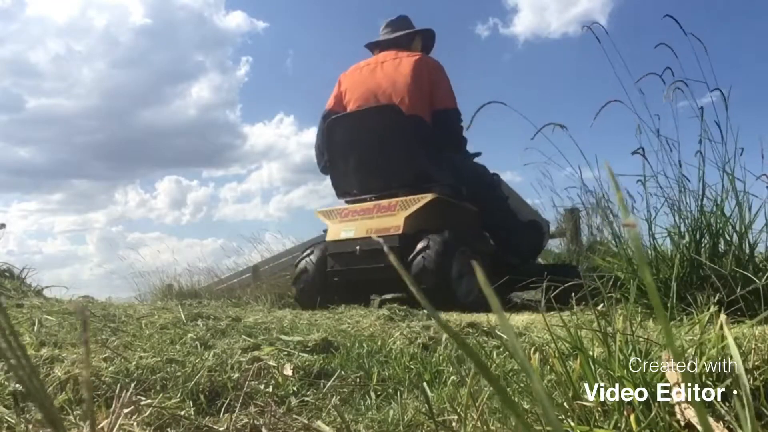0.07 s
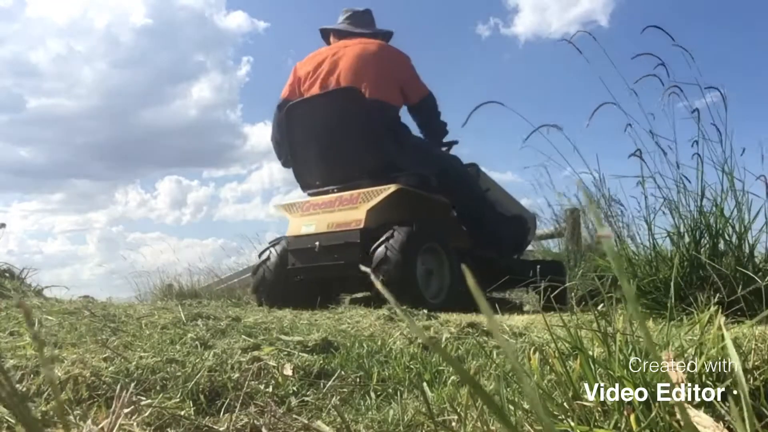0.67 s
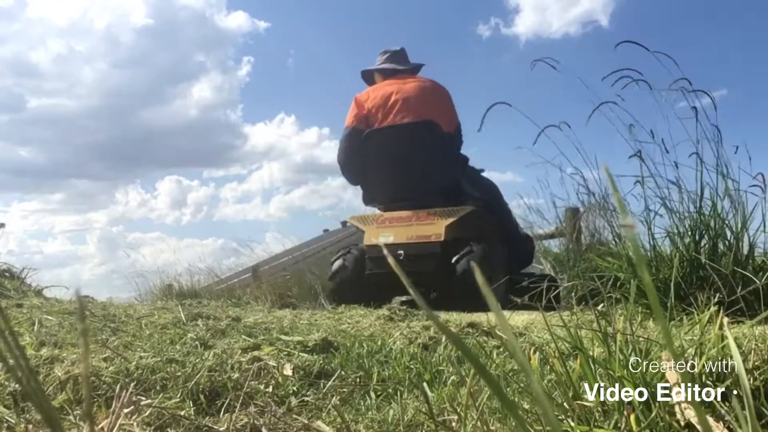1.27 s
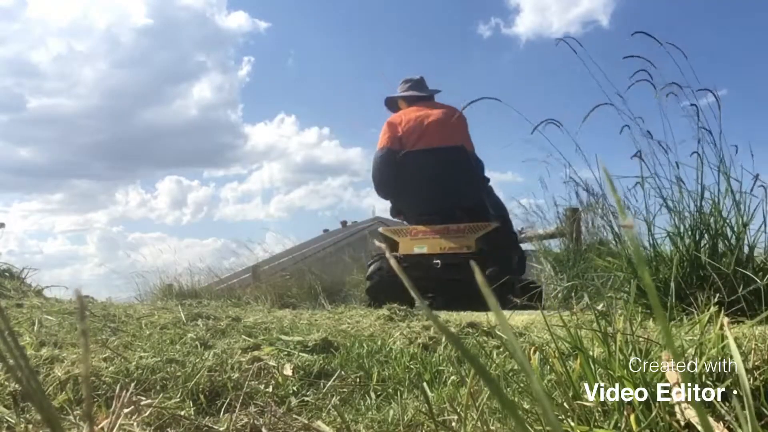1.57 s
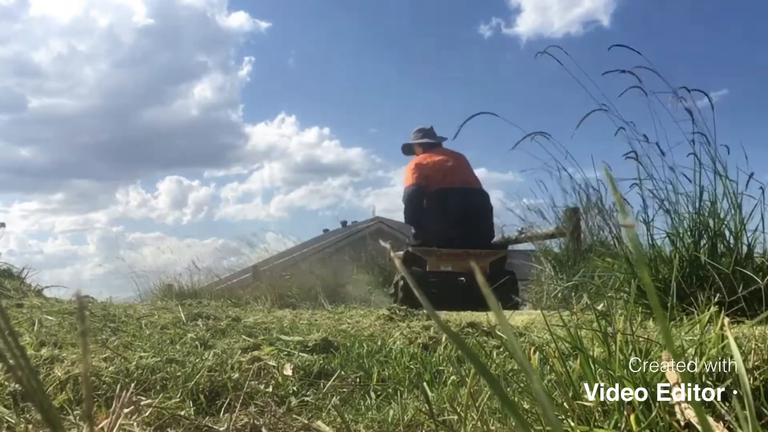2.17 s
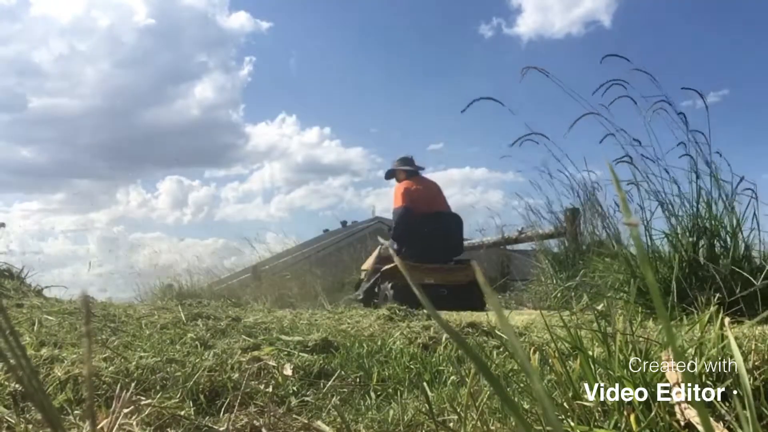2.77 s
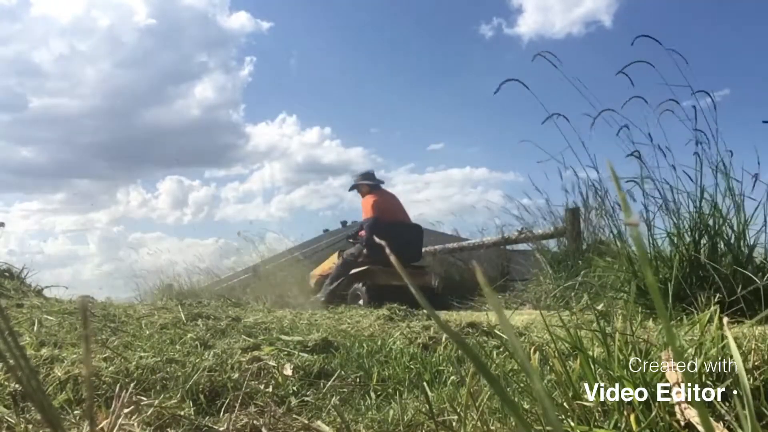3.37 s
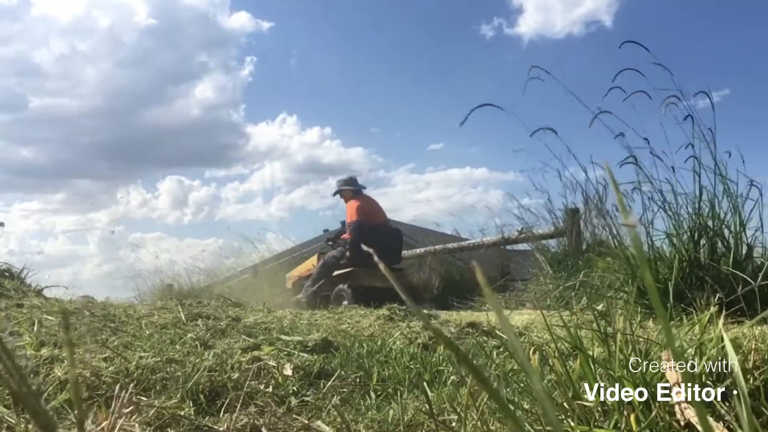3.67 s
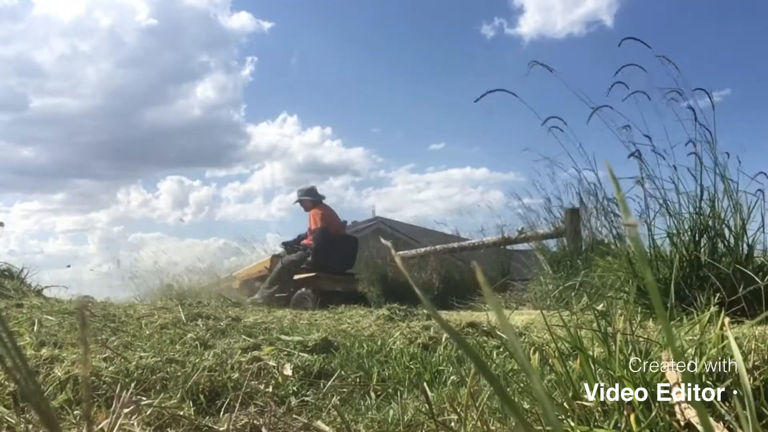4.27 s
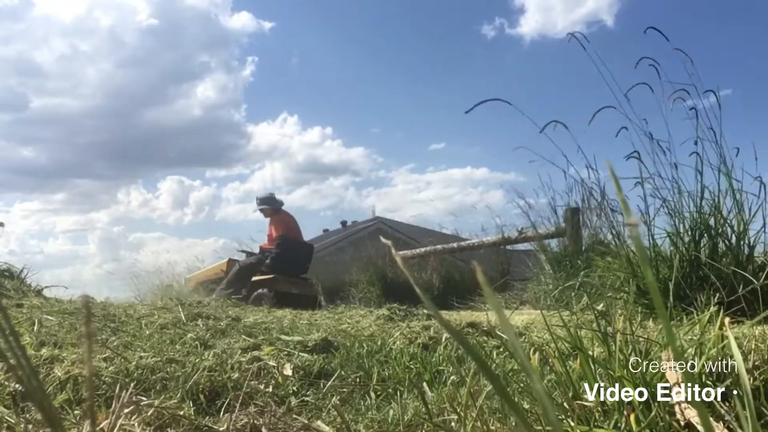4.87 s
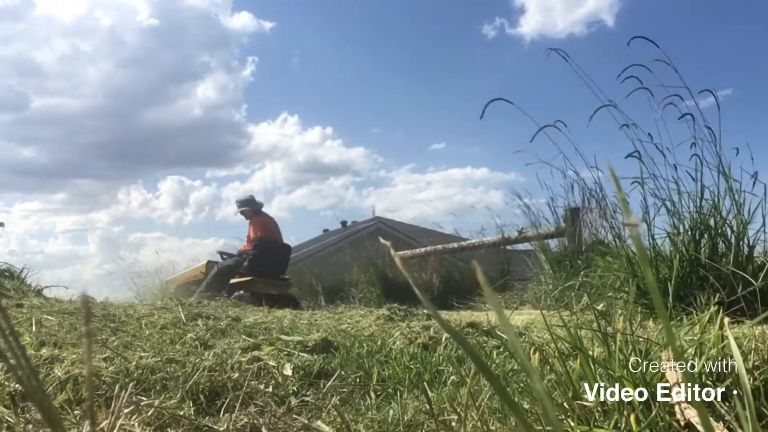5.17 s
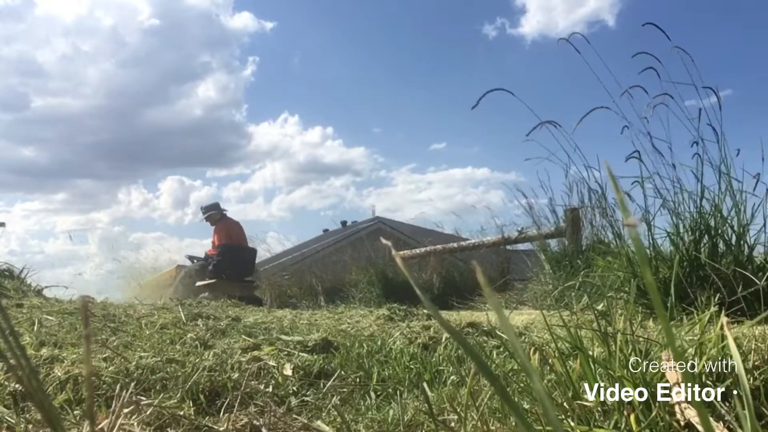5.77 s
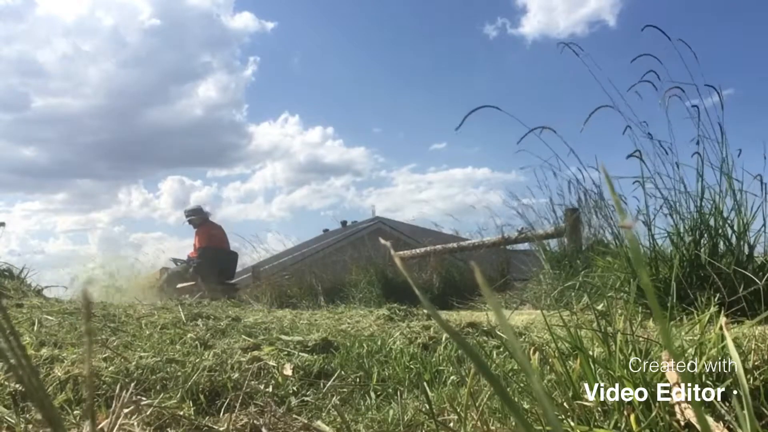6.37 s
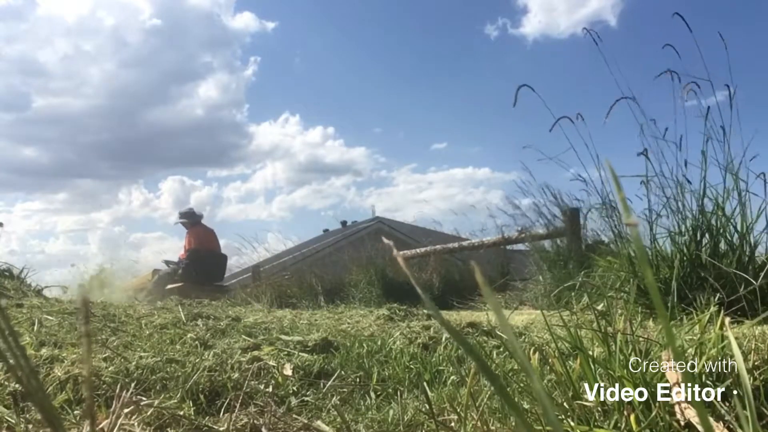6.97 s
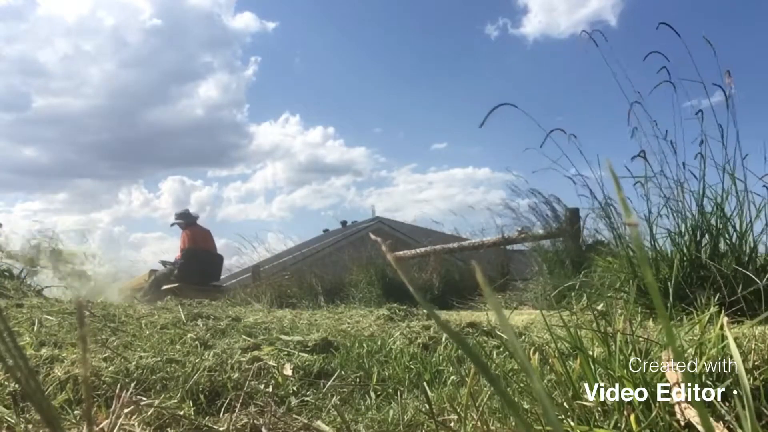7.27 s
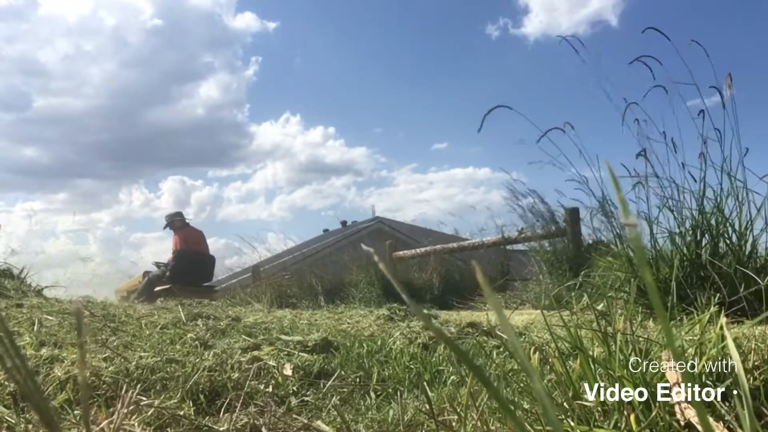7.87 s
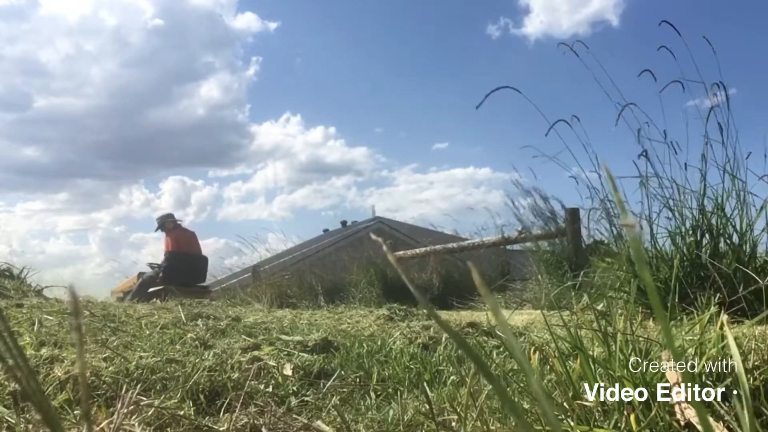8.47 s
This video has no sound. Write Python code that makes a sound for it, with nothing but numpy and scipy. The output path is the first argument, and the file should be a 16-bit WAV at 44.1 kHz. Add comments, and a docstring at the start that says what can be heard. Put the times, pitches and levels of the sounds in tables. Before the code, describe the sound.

A ride-on mower passes close to the microphone in an open field, its engine thudding and clattering over the hum and roar of the blades. A loose panel jingles briefly. The mower turns and drives away, growing quieter and duller, while cut grass hisses in swells and a stalk cracks. Near the end the engine sags in thick grass and picks up again. Light wind rumbles faintly.

```python
"""A ride-on mower's V-twin engine passes 2 m from the microphone, turns side-on and drives off
across a grass field to about 7.5 m. The exhaust thuds once per engine cycle and beats against the hum
of the belt-driven blades; both sag in thick grass. The deck roars, cut grass hisses and pelts the steel,
the valves clatter, the cowling buzzes, a loose panel jingles and the blades strike a few stalks.
Light wind rumbles on the microphone."""
import sys
import numpy as np
from scipy.fft import rfft, irfft, next_fast_len
from scipy.io import wavfile
from scipy.ndimage import map_coordinates

SR = 44100
rng = np.random.default_rng(int(sys.argv[2]) if len(sys.argv) > 2 else 0)


def file_out(sig):
    """Save sig as 16-bit WAV at sys.argv[1]."""
    # one column per channel
    cols = np.atleast_2d(sig).T
    # limit, then scale
    lim = np.clip(cols, -1, 1)
    pcm = np.round(lim * 32767).astype(np.int16)
    wavfile.write(sys.argv[1], SR, pcm)


N = 375291

NEAR_M, TOP_HZ = 2, 15900  # reference distance for the levels; upper band limit
# tufts of long grass going through the deck: peak_s, half_length_s, extra_hiss_db, extra_roar_db
TUFTS = [(2.88, 0.058, 5, 5), (3.55, 0.43, 7, 2), (4.02, 0.13, 4.5, -1.5), (4.55, 0.26, 2.5, 1),
         (6.03, 0.14, 3.5, 1), (6.7, 0.53, 5, 2.5), (8.38, .08, 3, -1)]


def exhaust(cycle, far, facing):
    """Each cycle's firings ring the muffler; from behind it is brighter and the gas jet rasps."""
    # exhaust note: cycle_multiple, behind_db, side_db
    harmonics = [(1, -62, -71), (2, -12.5, -11.5), (3, -10.5, -8), (4, -11, -11.5), (5, -0.5, 1.5),
                 (6, -.5, 0), (7, -5.5, -8.5), (8, -6.5, -2.5), (9, -3, -1.5), (10, -5.5, -13),
                 (11, -7, -9), (12, -18.5, -5), (13, -17, -16), (14, -13.5, -20), (15, -12.5, -16.5),
                 (16, -18, -15), (17, -31.5, -32), (18, -10, -18.5), (19, -22, -16.5), (20, -17, -30.5),
                 (21, -17, -23.5), (22, -19, -27), (23, -25, -38), (25, -26, -31.5), (26, -25.5, -37),
                 (30, -43.5, -51)]
    # gas jet spectrum: frequency_hz, level_db
    rasp = [(700, -40), (1100, 10), (1400, -9), (2800, 7), (4500, -0.5), (6500, -0.5), (8500, 3.5),
            (10500, 6.5), (13500, 1), (16000, -10.5)]
    orders, behind_db, side_db = np.transpose(harmonics)
    level_db = -20.5 - 1.86 * far + 4 * facing
    uneven = cycle - .018 + .0011 * wobble(20)
    strength_db = level_db + .55 * wobble(16)
    behind = pipe_ring(uneven, orders, behind_db, slope_db=13.0)
    side = pipe_ring(uneven, orders, side_db, slope_db=16.5)
    thud = -(facing * behind + (1 - facing) * side) * amp(strength_db)
    # the first cylinder spits hardest, the pipe rebounds, then the second cylinder fires
    first = burst(cycle, at=.005, rise=.03, fall=.07, scatter_db=3)
    rebound = burst(cycle, at=.17, rise=.04, fall=.05, scatter_db=3)
    second = burst(cycle, at=.31, rise=.02, fall=.07, scatter_db=3)
    jet = first + .38 * rebound + .24 * second
    return thud + coloured(noise() * jet, rasp) * facing ** 3 * amp(level_db - 15)


def pipe_ring(cycle, orders, db, slope_db, size=2048):
    """The pipe rings every cycle with these harmonics, falling slope_db an octave above the last."""
    k = np.arange(size // 2 + 1)
    octaves_above = np.log2(np.maximum(k / round(orders[-1]), 1))
    level_db = np.interp(k, np.round(orders), db) - slope_db * octaves_above
    cepstrum = irfft(np.log(amp(level_db)))
    cepstrum[1:size // 2] *= 2  # minimum phase: the ring follows the kick
    cepstrum[size // 2 + 1:] = 0
    ring = unit(irfft(np.exp(rfft(cepstrum)) * (k > 0)))
    return np.interp(cycle % 1, np.arange(size) / size, ring)


def blades(turn, far, facing, sag_hz):
    """Blade tips sweep past the deck wall; the hum wavers as grass loads them."""
    # tones of the hum: turn_multiple, relative_db
    harmonics = [(1, -38), (2, -53), (3, -17.5), (4, 1), (5, -9.5), (6, -25.5), (7, -17.5), (9, -15),
                 (10, -30), (11, -35), (12, -24.5), (16, -28.5)]
    # hum at the microphone: time_s, level_db
    hum_levels = [(0, -26), (1.2, -25), (2.1, -28), (3.4, -33.5), (3.95, -26.5), (4.75, -36.5), (5.15, -28),
                  (5.7, -28.5), (6.9, -37.5), (7.7, -28.5), (8.5, -33)]
    hum_db, = curves(hum_levels)
    turn = turn + .007 * wobble(8)
    hum = sum(partial(turn, k, hum_db + db + wobble(5.5)) for k, db in harmonics)
    octave_db = -26.5 - 5.5 * far - 10.5 * facing + 1.7 * sag_hz  # an octave over the strongest tone
    return hum + partial(turn, order=8, db=octave_db + 3.7 * wobble(11))


def deck(cycle, far, facing):
    """Air churns under the deck, throbbing with the engine; the open rear lets out more midrange."""
    # churning air: frequency_hz, level_db
    roar = [(20, -26), (45, -14), (90, -7), (140, 0), (300, 0), (380, -5), (620, -8), (800, -18),
            (1100, -26), (1500, -38), (4000, -70)]
    _, tuft_db = swells(TUFTS)
    throb = 1 + 1.1 * burst(cycle, at=.02, rise=.04, fall=.25, scatter_db=3)
    air = coloured(noise() * throb, roar)
    midrange = filtered(air, lambda f: f ** 4 / (f ** 4 + 420 ** 4))
    lost_in_grass = (1 - amp(-3 * far)) * midrange
    rear = filtered(air, lambda f: resonance(f, 405, 130) + resonance(f, 644, 78))
    return (air - lost_in_grass + .5 * facing * rear) * amp(-26 - 5 * far + tuft_db + wobble(7))


def clatter(cycle, far, facing, sag_hz):
    """Valves tick at set points of the cycle over the rush of the cooling fan."""
    # valves and fan: frequency_hz, level_db
    spectrum = [(500, -21), (900, 4), (1200, 3.5), (1360, -0.5), (1520, 1.5), (2100, 1), (2500, 2),
                (2900, 4.5), (3600, 0), (4200, -1), (5300, -1), (6300, -9.5), (8500, -5.5), (16000, -28)]
    ticks = burst(cycle, at=.19, rise=.01, fall=.12, scatter_db=5)
    ticks += burst(cycle, at=.02, rise=.01, fall=.08, scatter_db=5)
    level_db = -38.5 - 9 * far + 4.5 * facing + sag_hz
    return coloured(noise() * (1 + .35 * ticks), spectrum) * amp(level_db + .56 * wobble(8))


def cowling(cycle, far, facing):
    """The flywheel fan whines; each firing jolts the steel cowling into a buzz."""
    # fan whine at the microphone: time_s, level_db
    whine_levels = [(0, -29), (1, -34), (2, -33.5), (2.6, -49), (3.3, -44), (4.7, -50), (5.1, -45),
                    (5.7, -44.5), (6.9, -59), (8.5, -47.5)]
    # cowling buzz: cycle_multiple, relative_db
    harmonics = [(28, -2), (29, -10), (30, -4.5), (32, -9.5), (34, -12.5), (36, -10.5), (38, -23),
                 (40, -10.5), (42, -52), (44, -13), (46, -29), (48, -14.5), (58, -15), (60, -19.5),
                 (62, -35), (63, -17)]
    whine = partial(cycle, order=24, db=curves(whine_levels)[0] + 1.9 * wobble(8))
    jolt = cycle - .06 + .0012 * wobble(10)
    buzz_db = -40.5 - 11 * far + 5 * np.sin(np.pi * facing)  # loudest toward the rear quarter
    return whine + sum(partial(jolt, k, buzz_db + db + 3 * wobble(2.5)) for k, db in harmonics)


def grass(cycle, far):
    """Clippings spray from the chute in a fine crackle that shakes with the engine."""
    # spraying clippings: frequency_hz, level_db
    hiss = [(2500, -11), (5500, -4), (7200, -3.5), (8300, 0.5), (10000, -0.5), (11000, 1.5), (12200, -3.5),
            (13500, -0.5), (15000, -11.5), (16000, -8.5)]
    tuft_db, _ = swells(TUFTS)
    shake = 1 + .5 * burst(cycle, at=.24, rise=.017, fall=.38, scatter_db=8.5)
    crackle = amp(2.2 * wobble(900))
    level_db = -39 - 7.5 * far + tuft_db
    return coloured(noise() * shake * crackle, hiss) * amp(level_db + .91 * wobble(12))


def pelt(cycle, far, sag_hz):
    """Thick grass drags the engine down and pelts the steel deck, in pulses with each firing."""
    # ring of the deck: pitch_hz, width_hz, level_db
    modes = [(2930, 300, 0.5), (3950, 250, 1), (4770, 300, 3.5), (5400, 550, -1)]
    pulses = 1 + 1.5 * burst(cycle, at=.03, rise=.03, fall=.27, scatter_db=1)
    level_db = -55.5 - 5.5 * far + 5.5 * sag_hz
    return steel(noise() * pulses, modes) * amp(level_db + 1.2 * wobble(12))


def snaps():
    """Each stalk breaks on the blades with one short crack; bending waves carry its highs out first."""
    # stalks and twigs: start_s, level_db, t60_s, pitch_hz, width_hz
    stalks = [(5.1066, -12.3, .007, 5200, 3800), (5.1068, -18, .012, 950, 600),
              (5.1102, -26, .012, 4000, 1500), (7.166, -28, .035, 1300, 1200), (7.166, -30, .07, 2900, 350),
              (7.228, -38, .04, 4700, 2000), (7.43, -35, .05, 2950, 350), (7.913, -38, .015, 4000, 5000)]
    out, t = np.zeros(N + SR), np.arange(SR // 10) / SR
    bending = lambda f: np.exp(-2j * np.pi * .4 * (np.sqrt(f) - f / 2 / np.sqrt(TOP_HZ)))
    for s, db, t60, hz, width in stalks:
        crack = rng.choice([-1, 1], len(t)) * amp(db + 1.5 - 60 * t / t60)
        out[round(s * SR):][:len(t)] += filtered(crack, lambda f: resonance(f, hz, width) * bending(f))
    return out[:N]


def panel():
    """A loose steel panel chatters in short fits while the mower is close."""
    # ring of the panel: pitch_hz, width_hz, level_db
    modes = [(4510, 130, -4), (5310, 110, 0), (7300, 200, -12), (9550, 150, -12), (11450, 220, -5)]
    # the panel shakes: start_s, level_db
    jingles = [(.456, -23.5), (0.483, -42), (0.529, -26.5), (.552, -46), (1.895, -34), (1.919, -39),
               (1.945, -48), (2.087, -41)]
    t, t60_s = np.arange(N) / SR, .15
    fits = sum((t > s) * amp(db - 60 * np.abs(t - s) / t60_s) for s, db in jingles)
    contacts = noise() * amp(5 * wobble(250))
    return steel(contacts, modes) * fits


def breeze():
    """Light wind rumbles on the microphone in the grass, with a few gusts."""
    # wind on the microphone: frequency_hz, level_db
    rumble = [(20, -32), (34, -16), (52, 0), (90, 0), (150, -12), (400, -45)]
    # gusts: peak_s, half_length_s, rise_db
    gusts = [(4.2, .4, 1), (7.4, 1.4, 6), (8.12, 0.085, 12)]
    return coloured(noise(), rumble) * amp(-53 + swells(gusts)[0] + 2.2 * wobble(5.9))


def amp(db):
    """Decibels as amplitude."""
    return 10 ** (np.asarray(db) / 20)


def unit(x):
    """x at rms 1."""
    return x / np.sqrt(np.mean(x ** 2) + 1e-20)


def noise():
    """White noise for the whole scene."""
    return rng.standard_normal(N)


def curves(rows):
    """One value per sample for each column after the time."""
    s, *cols = np.transpose(rows)
    return [np.interp(np.arange(N) / SR, s, c) for c in cols]


def swells(rows):
    """Bell-shaped rises, one curve for each dB column after peak_s and half_length_s."""
    s, half, *cols = np.transpose(rows)
    bells = np.exp(-((np.arange(N) / SR - s[:, None]) / half[:, None]) ** 2)
    return [db @ bells for db in cols]


def wobble(rate, size=32):
    """A smooth random curve, rate knots a second, drawn at size points a knot."""
    where = np.arange(N) * rate / SR
    fine = np.arange(0, where[-1] + 1, 1 / size)
    knots = rng.standard_normal(int(where[-1]) + 4)
    return np.interp(where, fine, map_coordinates(knots, [fine]))


def burst(cycle, at, rise, fall, scatter_db):
    """An envelope that opens once a cycle, its peak scattered around 1; times in cycles."""
    count, age = np.divmod(cycle - at + 1, 1)
    shape = (1 - np.exp(-age / rise)) * np.exp(-age / fall)
    strength = amp(scatter_db * rng.uniform(-1.53, 1, int(count[-1]) + 1))
    return shape / shape.max() * strength[count.astype(int)]


def partial(turn, order, db):
    """A tone of this rms level, locked to a multiple of a rotation."""
    return np.sqrt(2) * amp(db) * np.cos(2 * np.pi * round(order) * turn)


def filtered(x, response):
    """x times a complex response of frequency."""
    size = next_fast_len(len(x) + SR // 4)
    return irfft(rfft(x, size) * response(np.fft.rfftfreq(size, 1 / SR)), size)[:len(x)]


def coloured(x, spectrum):
    """x shaped by (Hz, dB) points on a log axis, at rms 1."""
    f, db = np.transpose(spectrum)
    return unit(filtered(x, lambda hz: amp(np.interp(np.log(hz + 1), np.log(f), db))))


def resonance(f, centre, width):
    """Causal response of one mode."""
    return 1j * f * width / (centre ** 2 - f ** 2 + 1j * f * width)


def steel(x, modes):
    """x rings the modes of a steel sheet, at rms 1."""
    return unit(filtered(x, lambda f: sum(amp(db) * resonance(f, hz, width) for hz, width, db in modes)))


def scene():
    """The engine drives the blades by a slipping belt; distance, heading and load shape the mix."""
    # the engine sags in thick grass and the governor picks it up: time_s, four_stroke_cycle_hz
    speed = [(0, 26.301), (0.3, 26.369), (0.6, 25.952), (1, 25.566), (1.3, 25.826), (2, 25.874),
             (3.3, 25.607), (5.2, 25.821), (5.7, 25.69), (6.6, 24.55), (7.15, 23.783), (7.5, 24.673),
             (7.9, 25.139), (8.51, 25.391)]
    # the blade belt slips most while the engine labours: time_s, slip_percent
    slip = [(0, 2.29), (1.3, 2.35), (2.4, 2.64), (5.6, 2.61), (6.6, 3.9), (8.51, 2.81)]
    # the drive across the field: time_s, distance_m, facing (0 side-on, 1 exhaust at the microphone)
    path = [(0, 2, 0.88), (.6, 1.87, 0.95), (1.15, 2.33, 0.93), (1.55, 2.78, 0.66), (2.1, 3.56, 0.4),
            (2.6, 3.6, 0.1), (4, 4.34, 0.16), (5.5, 5.73, 0), (6.6, 6.96, 0.07), (8.5, 7.47, 0.17)]
    pulley_ratio, free_hz = 1.5, 26.4  # blade turns a cycle on a tight belt; cycle rate without load
    cycle_hz, = curves(speed)
    blade_hz = pulley_ratio * cycle_hz * (1 - curves(slip)[0] / 100)
    sag_hz = free_hz - cycle_hz
    cycle = .277 + np.cumsum(cycle_hz) / SR
    turn = .048 + np.cumsum(blade_hz) / SR
    distance_m, facing = curves(path)
    far = np.log2(distance_m / NEAR_M)  # doublings of distance
    engine = exhaust(cycle, far, facing) + cowling(cycle, far, facing)
    rattles = clatter(cycle, far, facing, sag_hz) + panel()
    air = blades(turn, far, facing, sag_hz) + deck(cycle, far, facing)
    cuttings = grass(cycle, far) + pelt(cycle, far, sag_hz) + snaps()
    return (engine + rattles + air + cuttings + breeze())[None]


def record(dry):
    """One microphone in the open field, with nothing above its band limit."""
    return np.array([filtered(x, lambda hz: hz < TOP_HZ) for x in dry])


dry = scene()
out = record(dry)
file_out(out)
```